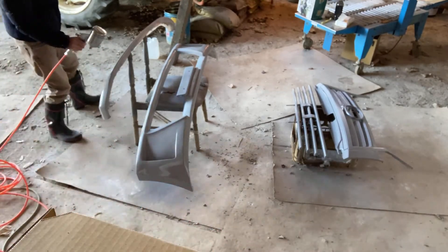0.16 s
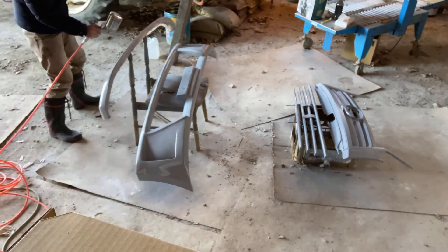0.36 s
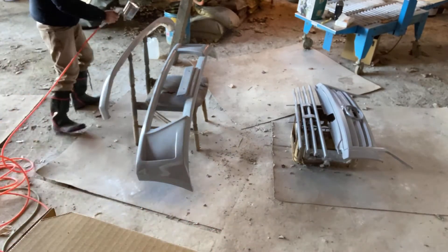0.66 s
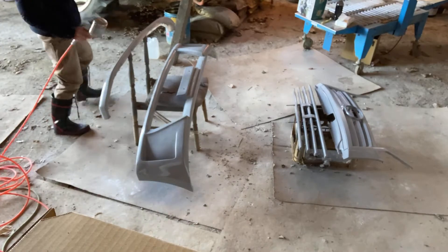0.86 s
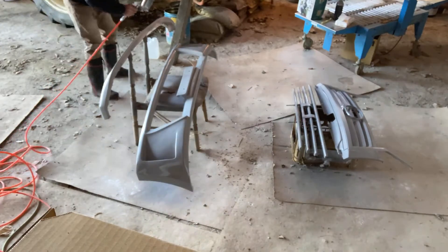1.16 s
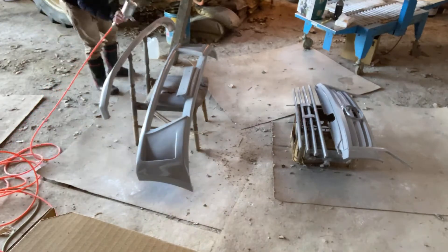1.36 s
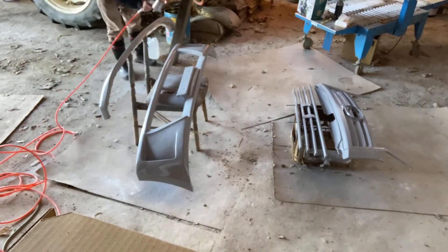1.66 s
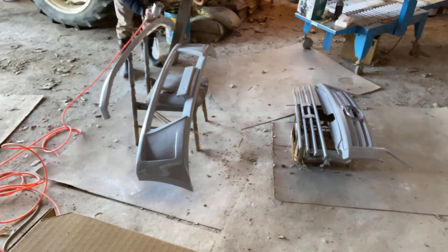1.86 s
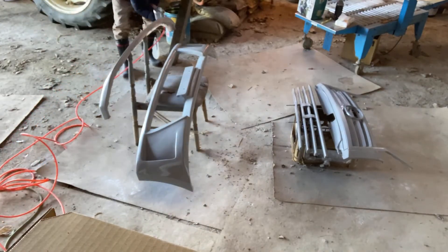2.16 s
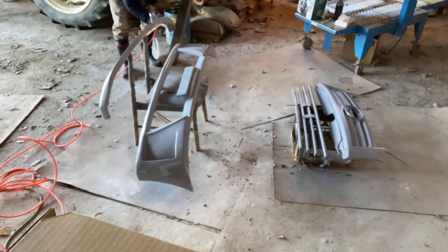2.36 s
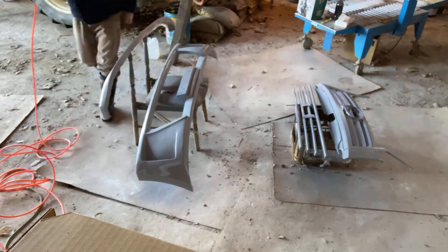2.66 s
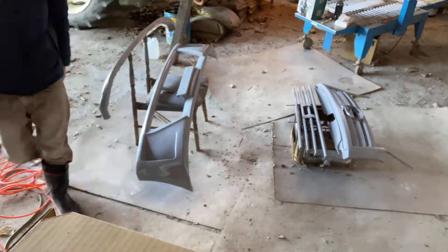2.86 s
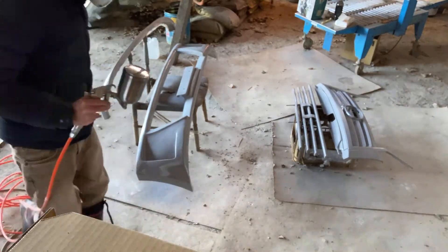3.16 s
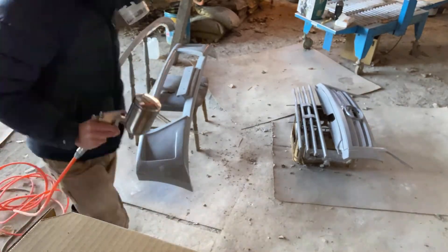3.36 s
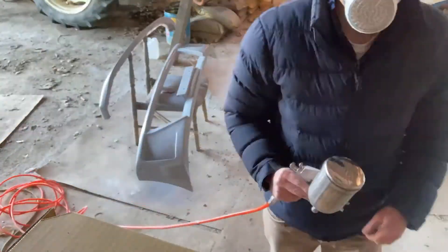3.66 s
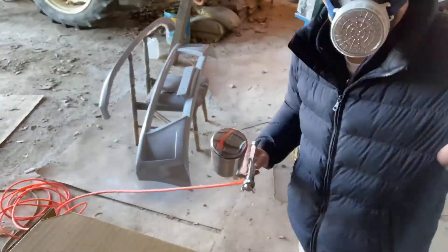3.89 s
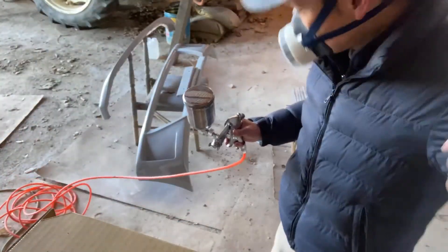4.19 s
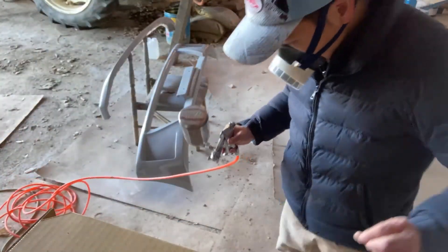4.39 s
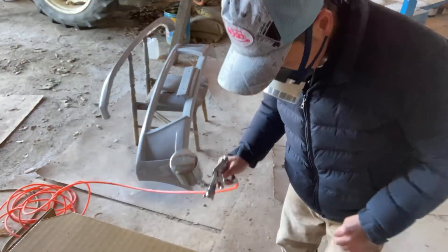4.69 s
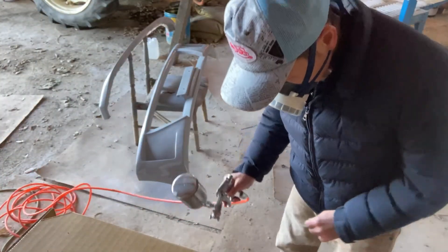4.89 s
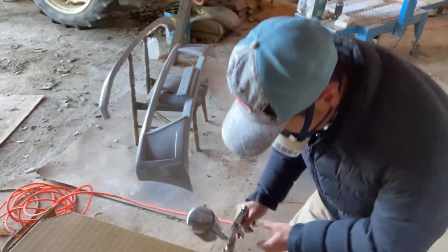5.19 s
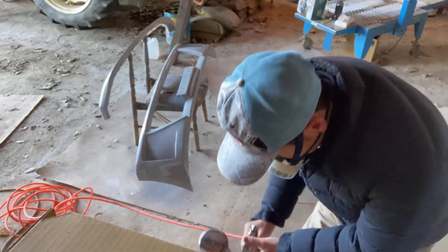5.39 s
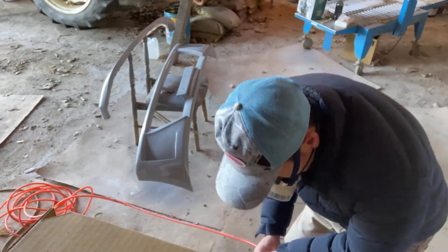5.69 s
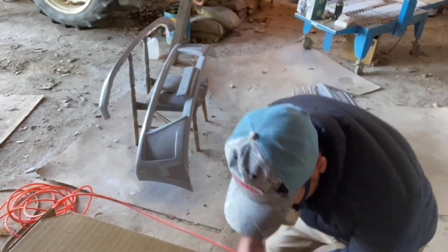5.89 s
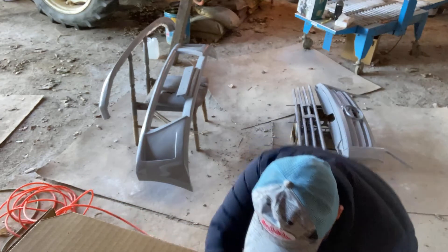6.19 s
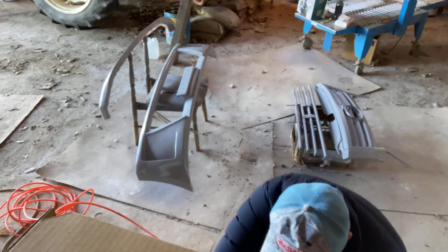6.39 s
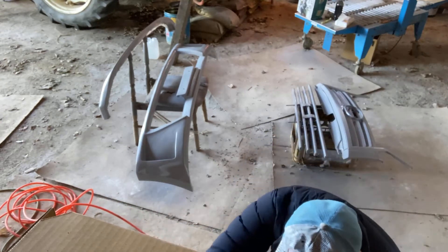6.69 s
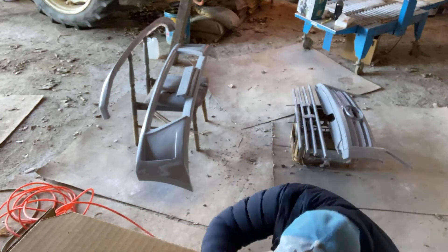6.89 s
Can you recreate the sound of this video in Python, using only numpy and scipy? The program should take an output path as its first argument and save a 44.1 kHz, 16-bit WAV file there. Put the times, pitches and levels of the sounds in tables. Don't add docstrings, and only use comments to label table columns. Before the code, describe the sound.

A quiet opening of thin electric whining, slightly wavering and swelling a little, with a light footfall and scuff on boards. Then, with no run-up, a piston compressor close to the stereo floor microphone takes over, far louder: a fast pulsing low buzz, hard casing clatter, valve puffs and mains hum. It runs unchanged in the barn, with only a short puff of air from a fitting around five seconds.

```python
import sys
import numpy as np
from scipy import signal
from scipy.fft import rfft, irfft, next_fast_len
from scipy.io import wavfile
from scipy.ndimage import map_coordinates

SR = 44100
rng = np.random.default_rng(int(sys.argv[2]) if len(sys.argv) > 2 else 0)


def natural_amplitude(level_db):
    exponent = np.asarray(level_db, float) / 20
    return 10 ** exponent


def to_wav(s):
    ch = np.atleast_2d(s).T
    pcm = np.round(np.clip(ch, -1, 1) * 32767)
    wavfile.write(sys.argv[1], SR, pcm.astype(np.int16))


N = 310905
T = np.arange(N) / SR
CUT_IN = 4.0415
REED_START = 1.4
SLAP_LEAD = 0.075

# shaft order, left lead in rad,
# left minus right in dB, likeness of the two sides from 0 to 1.
PORTS = [(2.01, 0, -2, 0.96), (8, 0.25, -1.5, 0), (14.2, 0.97, 0.5, 1), (17.7, 1.26, 1.5, 1),
         (30.7, 1.27, 2.5, 1), (49, 3.5, 5.5, 0), (96, 1.44, 3.5, 0.6), (394, 1.46, -0.5, 0.6)]


def unit(x):
    return x / np.sqrt(np.mean(x ** 2) + 1e-20)


def along(points, hz, column=1):
    rows = np.transpose(points)
    return np.interp(np.log(hz + 1e-3), np.log(rows[0]), rows[column])


def speed_curve(rows):
    seconds, speed = np.transpose(rows)
    return np.interp(T, seconds, speed)


def wobble(rate):
    knots = rng.standard_normal(int(N * rate / SR) + 4)
    return map_coordinates(knots, [T * rate])


def noise_pair():
    return rng.standard_normal((2, N))


def filtered(x, response):
    m = next_fast_len(N + SR // 2)
    return irfft(rfft(x, m) * response(np.fft.rfftfreq(m, 1 / SR)), m)[..., :N]


def ports(order):
    half = np.exp(.5j * along(PORTS, order)) * natural_amplitude(along(PORTS, order, column=2) / 2)
    return np.array([half, 1 / half]) / np.maximum(abs(half + 1 / half) / 2, .6)


def spread(pair, colour, shaft_hz):
    def response(hz):
        likeness = along(PORTS, hz / shaft_hz, column=3)
        angle = np.arccos(np.clip(likeness, 0, 1)) / 2
        return colour(hz) * np.array([np.cos(angle), np.sin(angle)])

    direct, scattered = filtered(pair, response)
    sides = np.array([direct + scattered, direct - scattered])
    both = filtered(sides, lambda hz: ports(hz / shaft_hz))
    return both / np.std(both.mean(axis=0))


def stroke(turn, shut, decay, depth_db):
    since_open = (turn + 0.248) % 1
    opened = np.minimum(since_open / 0.013, 1) * np.exp(-np.maximum(since_open - shut, 0) / decay)
    return unit(1 + natural_amplitude(depth_db) * opened)


def flutter(turn, orders, reed_db, upper_db):
    peak_moment = [(3, .34), (4, -.11), (11, -.255), (12, .14), (13, .23), (15, -.08), (17, .22), (24, .19),
                   (28, -.03)]
    odd_stroke = 0.13
    lag = 2 * np.pi * np.cumsum(along(peak_moment, np.arange(60)))
    shake = 0.0094 * wobble(25)
    out = np.zeros((2, N))
    for k, db in orders:
        phase = k * (2 * np.pi * turn + shake) + REED_START - lag[int(k)] + lag[14]
        swing = 1 + odd_stroke * k / 14 * np.cos(np.pi * turn + 0.59 * k)
        lift_db = reed_db * (k == 14) + upper_db * (k > 20)
        strength = natural_amplitude(db + wobble(2.47) + lift_db) * swing
        out += (ports(k)[:, None] * strength * np.exp(1j * phase)).real
    return np.sqrt(2) * out


def clatter(turn, scale, habit, uneven_db, crackle_db, depth_db):
    # centre in Hz, width in Hz, level in dB.
    casing_modes = [(1094, 106, 0.5), (1271, 45, -1), (1508, 105, 0.5), (1793, 53, -6), (1940, 47, -2.5),
                    (2218, 70, -5), (2424, 64, 0.5), (2883, 113, -2), (3200, 184, -6), (3695, 180, -5),
                    (4163, 75, -6), (5505, 200, -15.5)]
    top_hz, corner_hz = 15650, 850

    def ring(f):
        total = 0
        for k, (centre, width, db) in enumerate(casing_modes):
            mode = 1j * f * width / (centre * centre - f * f + 1j * f * width)
            total = total + (-1) ** k * natural_amplitude(db) * mode
        return total

    def colour(f):
        return (f < top_hz) * ring(f / scale) / (1 + (corner_hz * scale / (f + 1)) ** 4)

    steps = round(3046 / scale)
    repeat = rng.standard_normal((2, steps))[:, (turn / 2 % 1 * steps).astype(int)]
    bounce = natural_amplitude(2.5 * np.cos(2 * np.pi * 14 * turn + .5))
    roughness = natural_amplitude(uneven_db * wobble(45) + crackle_db * wobble(600 * scale))
    force = roughness * bounce * stroke(turn + SLAP_LEAD, shut=0.26, decay=0.11, depth_db=depth_db)
    return spread(force * (habit * repeat + noise_pair()), colour, shaft_hz=29 * scale)


def hum(lines):
    return sum(np.sqrt(2) * natural_amplitude(db) * np.sin(2 * np.pi * hz * T) for hz, db in lines)


def whine():
    # seconds, turns a second.
    pump_speed = [(0, 174.5), (.4, 174.8), (1.6, 175.37), (2.25, 175.51), (2.5, 175.46), (3, 175.07),
                  (4.05, 174.4)]
    # shaft order, level in
    # dB.
    pump_orders = [(1, -29.5), (2, -5.5), (3, -20), (4, -8.5), (5, -10), (6, -14.5), (7, -17.5), (8, -9),
                   (9, -9), (10, -12), (11, -1.5), (12, -9), (13, 4.5), (14, -2), (15, 4), (16, -21),
                   (17, -7), (18, -6), (19, -11.5), (20, -31), (21, -17), (22, -19), (23, -15), (24, -26),
                   (25, -16), (26, -19.5), (27, -20), (29, -12.5), (31, -22),
                   (16.5, -20), (26.5, -16), (28, -27), (30, -32)]
    # frequency in Hz, level in dB per Hz.
    pump_air = [(120, -128), (260, -112), (450, -99), (1100, -106), (2500, -89.5), (3500, -105),
                (5000, -99), (15600, -111)]
    # frequency in Hz, level in dB.
    pump_hum = [(180, -96), (540, -90), (720, -70), (900, -82)]

    speed = speed_curve(pump_speed)
    turn = np.cumsum(speed) / SR + .3
    ending = np.clip(1 - (CUT_IN - T) / 0.33, 0, 1)
    reed_db = 0.5 - 2.5 * (speed - 175.46) + 5 * ending
    tones = flutter(turn, pump_orders, reed_db, upper_db=1.5 + 0.5 * wobble(4))
    drive = stroke(turn, shut=1.0, decay=0.17, depth_db=17.0) * noise_pair()
    air = spread(drive, lambda f: natural_amplitude(along(pump_air, f)), shaft_hz=204)
    casing = clatter(turn, scale=6.04, habit=0.95, uneven_db=1.6, crackle_db=2.0, depth_db=8.5)
    pump = natural_amplitude(-53) * tones + natural_amplitude(-57.5 + 0.67 * wobble(7.4)) * air + natural_amplitude(-61.5) * casing
    return natural_amplitude(0.5 * ending) * pump + hum(pump_hum)


def puffs():
    # centre in seconds, level in dB, centre in Hz, length in seconds.
    soft_noises = [
        (2.625, -57, 650, .006),
        (2.72, -69, 800, .015),
        (2.83, -66, 750, .012),
        (3.975, -67, 300, .02),
        (5.23, -47, 8500, .03),
        (5.22, -39, 2200, .03),
        (3.5, -61, 4700, .12),
    ]
    out = np.zeros((2, N))
    for s, db, centre, length in soft_noises:
        band = filtered(noise_pair(), lambda f: np.exp(-(np.log((f + 1) / centre) / .5) ** 2))
        out += natural_amplitude(db) * unit(band) * np.exp(-((T - s) / length) ** 2)
    return out


def compressor():
    # seconds, turns a second.
    piston_speed = [(4.04, 28.968), (7.05, 28.938)]
    # shaft order, level in dB.
    piston_orders = [(1, -29), (2, -9), (3, -20.5), (4, -13), (5, -11.5), (6, -19.5), (7, -18.5), (8, -15),
                     (9, -12.5), (10, -16), (11, -8.5), (12, -18.5), (13, -0.5), (14, 2), (15, 1),
                     (16, -13), (17, -17.5), (18, -11.5), (19, -15.5), (21, -35), (22, -39), (23, -17),
                     (24, -25.5), (25, -19), (26, -16), (27, -17), (28, -28), (29, -18.5), (31, -23),
                     (32, -27),
                     (20, -29), (30, -32), (36, -29), (39, -30), (44, -26), (49, -30)]
    # frequency in Hz, level in dB per Hz.
    piston_air = [(20, -95), (70, -60), (190, -61), (300, -62), (400, -63), (600, -64), (780, -55),
                  (980, -68.5), (1300, -100)]
    valve_blast = [(2650, -26), (4500, -3), (5600, -8), (6500, -10), (8500, -7.5), (9600, -14),
                   (12000, -16), (15700, -12.5)]
    fitting_leak = [(7000, -41), (10500, -4), (12000, 2), (15700, -1)]
    # frequency in Hz, level in dB.
    piston_hum = [(60, -72), (120, -53), (180, -60)]

    turn = np.cumsum(speed_curve(piston_speed)) / SR
    turn = turn - np.interp(4.1653, T, turn)
    tones = flutter(turn, piston_orders, reed_db=0.5, upper_db=1.2)
    breath = stroke(turn, shut=0.93, decay=0.36, depth_db=-49.0) * noise_pair()
    air = spread(breath, lambda f: natural_amplitude(along(piston_air, f)), shaft_hz=26.7)
    casing = clatter(turn, scale=1, habit=1.37, uneven_db=1.17, crackle_db=1.5, depth_db=3.0)
    burst = stroke(turn + SLAP_LEAD, shut=0.12, decay=0.25, depth_db=-2.5) * noise_pair()
    blast = spread(burst, lambda f: natural_amplitude(along(valve_blast, f)), shaft_hz=28)
    leak = spread(noise_pair(), lambda f: natural_amplitude(along(fitting_leak, f)), shaft_hz=28)
    return (natural_amplitude(-30.5) * tones + natural_amplitude(-43.5) * air + natural_amplitude(-38.5) * casing
            + natural_amplitude(-51.5) * blast + natural_amplitude(-57.5) * leak + hum(piston_hum))


def scene():
    stop = np.clip((CUT_IN - T) / 0.0005, 0, 1)
    rise = np.clip((T - CUT_IN) / .013, 0, 1) ** 1.6
    return stop * whine() + puffs() + rise * compressor()


def band_limit(x):
    return signal.sosfilt(signal.butter(12, 15690, fs=SR, output="sos"), x)


def record(dry):
    return band_limit(dry)


dry = scene()
out = record(dry)
to_wav(out)
```